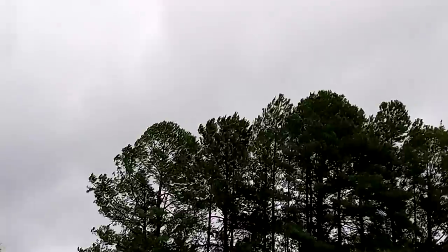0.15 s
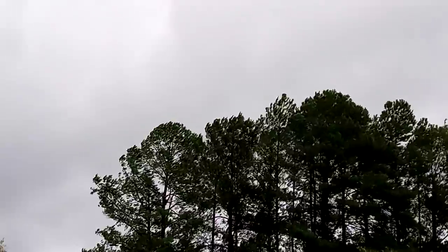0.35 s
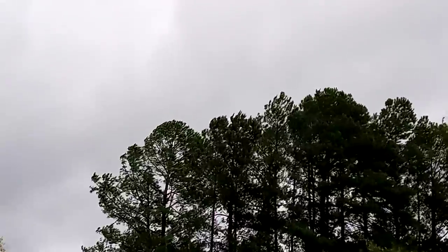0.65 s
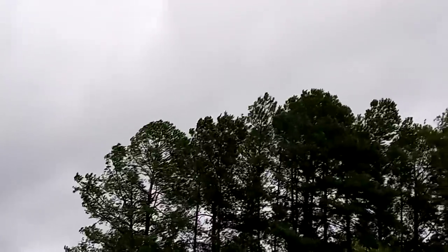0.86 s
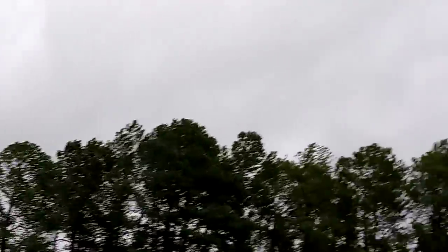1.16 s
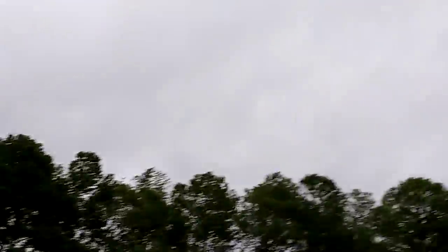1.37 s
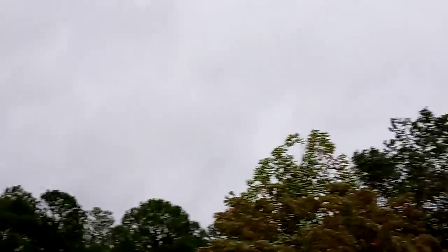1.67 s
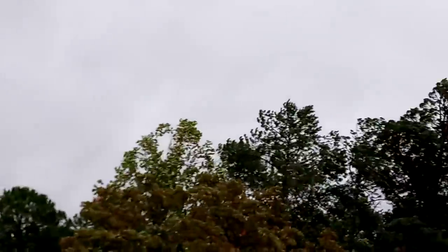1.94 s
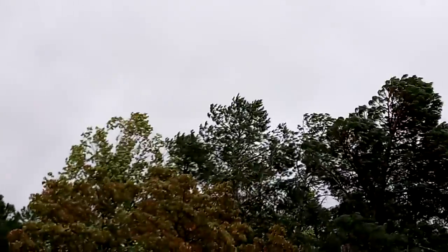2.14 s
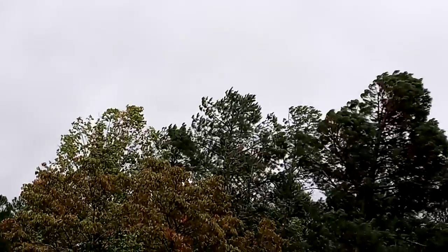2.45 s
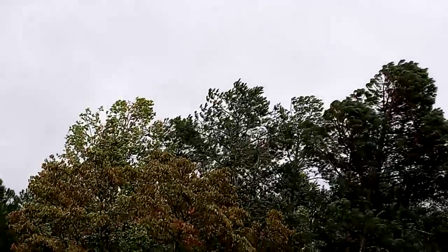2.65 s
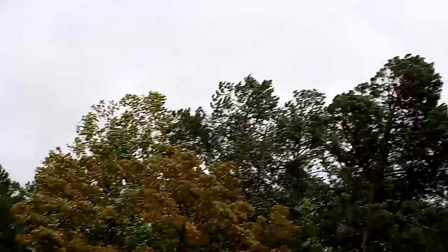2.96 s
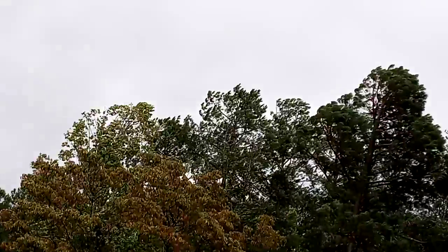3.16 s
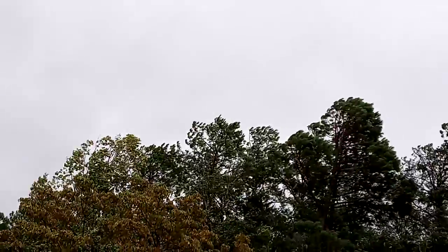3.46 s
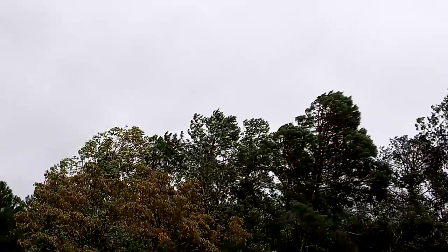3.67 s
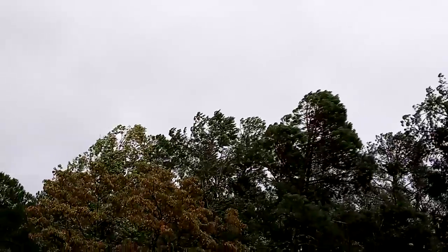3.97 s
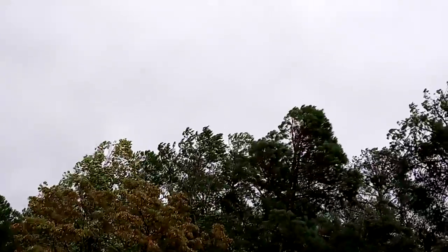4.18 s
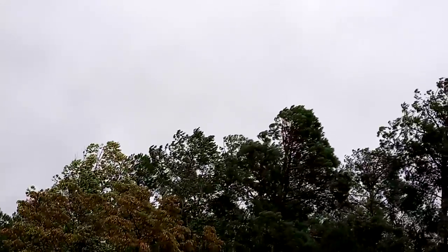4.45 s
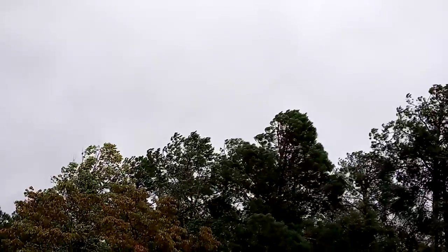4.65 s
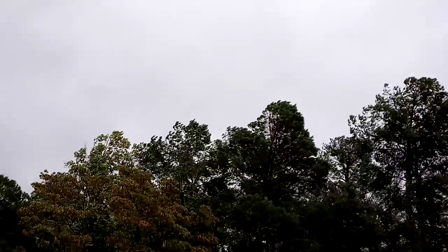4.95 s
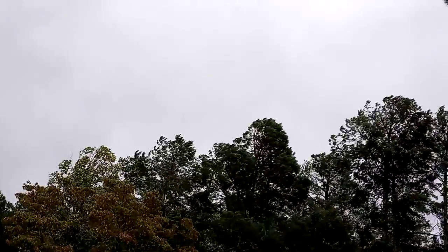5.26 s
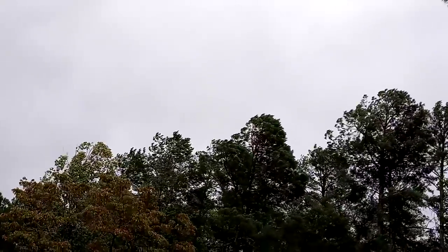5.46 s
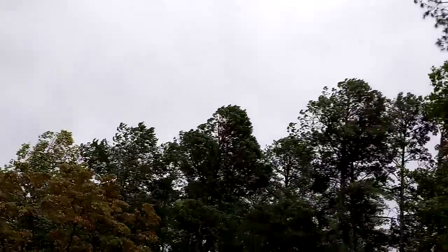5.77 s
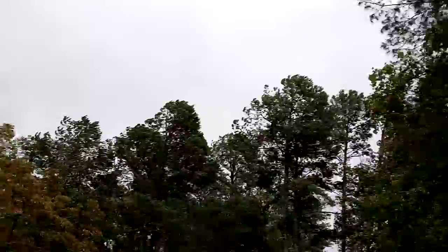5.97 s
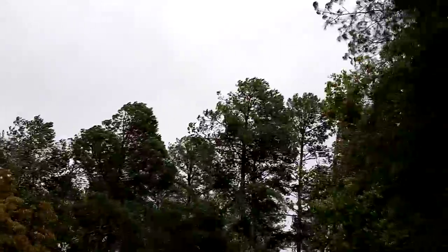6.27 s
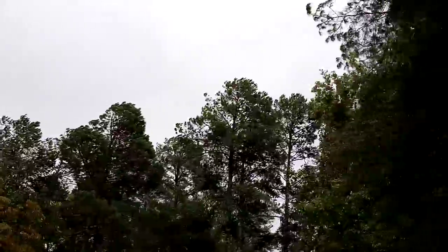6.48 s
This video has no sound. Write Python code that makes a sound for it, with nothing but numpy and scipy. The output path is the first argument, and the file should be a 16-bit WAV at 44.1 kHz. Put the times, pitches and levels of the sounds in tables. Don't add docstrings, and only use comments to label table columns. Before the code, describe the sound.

Broad hissing rush of wind in many treetops, with uneven bassy microphone buffeting, a few tiny ticks, and a close branch rustle at the end.

```python
import sys
import numpy as np
from scipy import signal
from scipy.fft import rfft, irfft, next_fast_len
from scipy.io import wavfile
from scipy.ndimage import uniform_filter1d

SR = 44100
rng = np.random.default_rng(int(sys.argv[2]) if len(sys.argv) > 2 else 0)


def inscribe(sig):
    pcm = np.round(np.clip(np.atleast_2d(sig).T, -1, 1) * 32767)
    wavfile.write(sys.argv[1], SR, pcm.astype(np.int16))


def makeup_ratio(level_db):
    decades = np.asarray(level_db, float) / 20
    return 10 ** decades


N = 291677
T = np.arange(N) / SR
SIZE = next_fast_len(N)
HZ = np.maximum(np.arange(SIZE // 2 + 1) * SR / SIZE, 1)


def curves(table):
    s, *columns = np.transpose(table)
    return [np.interp(T, s, c) for c in columns]


def colour(x, points):
    hz, db = np.transpose(points)
    gain_db = np.interp(np.log(HZ), np.log(hz), db, left=-90, right=-90)
    return rfft(x, SIZE) * makeup_ratio(gain_db)


def band_level(spectrum, lo_hz, hi_hz):
    inside = spectrum[(HZ > lo_hz) & (HZ < hi_hz)]
    return spectrum * SIZE / np.sqrt(2 * np.sum(np.abs(inside) ** 2))


def to_wave(spectrum):
    return irfft(spectrum, SIZE)[:N]


def bands(spectrum, centres_hz):
    for one_hot in np.eye(len(centres_hz)):
        yield to_wave(spectrum * np.interp(np.log(HZ), np.log(centres_hz), one_hot))


def walk(rate_hz):
    k = int(SR / rate_hz)
    held = np.repeat(rng.standard_normal(N // k + 1), k)
    slewed = uniform_filter1d(uniform_filter1d(held, k), k)[:N]
    return slewed / slewed.std()


def eddies(rate_hz, spread_db):
    x = rng.standard_normal(N) * makeup_ratio(spread_db * walk(rate_hz))
    return x / x.std()


def swells(rows, rest_db, rise_s, fall_s):
    power = makeup_ratio(2 * rest_db) + 0 * T
    for start_s, hold_s, level_db in rows:
        rise = np.clip((T - start_s) / rise_s + .5, 0, 1) ** 2
        fall = np.exp(-2 * np.maximum(T - start_s - hold_s, 0) / fall_s)
        power = power + makeup_ratio(2 * level_db) * rise * fall
    return 10 * np.log10(power)


def pulse(pitch_hz, cycles):
    t = np.arange(-1200, 1200) / SR
    bell = np.exp(-.5 * (t * pitch_hz / (0.34 * cycles)) ** 2)
    return bell * np.cos(2 * np.pi * pitch_hz * t + rng.uniform(0, 2 * np.pi))


def add(out, centre_s, x):
    i = int(centre_s * SR) - len(x) // 2 + np.arange(len(x))
    inside = (i >= 0) & (i < N)
    out[i[inside]] += x[inside]


# freq_hz, density_db_per_hz
HISS_COLOUR = [(6000, -22), (8500, -5), (9500, -5), (11000, -8.5), (12500, -12.5), (16000, -10)]


def hiss(level_db=-90):
    noise = colour(rng.standard_normal(N), HISS_COLOUR)
    return makeup_ratio(level_db) * to_wave(band_level(noise, 9500, 15500))


# centre_s, peak_db, pitch_hz
TICKS = [
    (.441, -26, 600),
    (0.494, -25, 596),
    (2.655, -18, 790),
]


def ticks():
    out = np.zeros(N)
    for centre_s, peak_db, pitch_hz in TICKS:
        add(out, centre_s, makeup_ratio(peak_db) * pulse(pitch_hz, 1.0))
    return out


# centre_s, peak_db, pitch_hz
THUMPS = [(.15, -25.5, 151), (0.194, -23, 180), (.359, -22.5, 150), (0.444, -23, 190), (0.494, -21, 180),
          (.553, -18.5, 200), (.584, -18.5, 150), (.649, -24, 160), (0.758, -26, 180), (1.081, -22.5, 180),
          (1.192, -21, 170), (1.247, -17.5, 183), (2.046, -22, 210), (2.11, -19, 200), (2.162, -26, 130),
          (2.456, -27, 160), (2.632, -18, 190), (2.708, -16, 197), (2.77, -17, 200), (2.879, -18.5, 189),
          (2.902, -19, 160), (2.955, -26, 180), (3.03, -18, 190), (3.066, -25, 160), (3.449, -26, 160),
          (4.026, -31, 140), (5.096, -26, 170), (6.421, -23, 160), (6.513, -27.5, 180), (6.575, -23, 181)]


def thumps(body_db=-3.5, front_db=-7):
    out = np.zeros(N)
    for centre_s, peak_db, pitch_hz in THUMPS:
        add(out, centre_s, makeup_ratio(peak_db + body_db) * pulse(pitch_hz, 1.24))
        add(out, centre_s - .002, makeup_ratio(peak_db + front_db) * pulse(2.4 * pitch_hz, 0.95))
    return out


# start_s, hold_s, level_db
SHAKES = [
    (6.43, 0.044, -29),
    (6.545, 0.02, -30),
    (6.58, .02, -26.5),
]
# freq_hz, density_db_per_hz
SHAKE_COLOUR = [(300, -34), (600, -2), (1000, 0), (1700, 3.5), (2600, -4), (3700, -7), (4500, -26),
                (6100, -16), (7200, -34), (8500, -50), (12000, -70)]


def branches(grain_db=2.5):
    level_db = swells(SHAKES, rest_db=-50, rise_s=0.0082, fall_s=.06)
    rustle = band_level(colour(eddies(150, grain_db), SHAKE_COLOUR), 900, 3500)
    onset = np.clip((T - SHAKES[0][0]) / .03, 0, 1)
    return to_wave(rustle) * makeup_ratio(level_db) * onset


# start_s, hold_s, level_db
GUSTS = [(-.03, .07, -41.5), (1.3, 0.17, -46.5), (.12, 0.6, -37), (.83, 0.029, -37), (.95, 0.31, -38),
         (1.76, .04, -40), (1.9, 0.061, -36), (2.06, 0.2, -36.5), (2.34, 0.16, -36), (2.51, 0.18, -39.5),
         (2.68, 0.028, -38.5), (2.75, 0.087, -35.5), (2.86, .18, -33.5), (3.08, 0.14, -37),
         (3.31, 0.044, -37.5), (3.45, 0.15, -40), (3.64, 0.13, -48), (3.86, 0.051, -40), (4.0, 0.032, -42),
         (4.13, 0.22, -42.5), (4.42, .12, -38), (4.64, .05, -38), (5.0, .25, -39), (5.29, .08, -46.5),
         (5.5, 0.039, -40.5), (5.66, 0.062, -48), (5.88, 0.069, -48), (6.05, .1, -51), (6.39, 0.23, -39)]
# freq_hz, density_db_per_hz
RUMBLE_COLOUR = [(12, -45), (20, -24.5), (56, -4.5), (107, 1.5), (255, -6), (386, -14), (428, -13.5),
                 (621, -19.5), (700, -28), (910, -45.5), (1540, -120)]


def buffet(puff_db=0.8, reach_db_per_db=0.35, plume_db=-1.0):
    rumble_db = swells(GUSTS, rest_db=-47.5, rise_s=0.052, fall_s=0.078)
    air = band_level(colour(eddies(40, puff_db), RUMBLE_COLOUR), 50, 160)
    low, high = bands(air, (110, 230))
    high_db = reach_db_per_db * (rumble_db + 34.5) + plume_db
    return makeup_ratio(rumble_db) * (low + high * makeup_ratio(high_db))


# time_s, wind_db, turn (0-1), aim at nearest needles (0-1)
ROAR = [(0.0, -37, 0, 0.34), (0.5, -36, 0, 0), (0.95, -36, 0.04, 0.9), (1.55, -36, 0.33, 0.6),
        (2.65, -34.5, 0.36, 0.93), (3.3, -34.5, 0.69, 0.37), (4.85, -33.5, 0.98, 0), (5.05, -33, 0.85, 0),
        (5.7, -34.5, 0.98, 0), (6.3, -35, 1, 0.27), (6.61, -33.5, 1, 0.6)]
ROAR_HZ = (900, 3000, 5800, 7900)
TURN_DB = (0, 2, 10, -2)
AIM_DB = (-0.5, 4, 0, 7)
# freq_hz, density_db_per_hz
CROWNS_COLOUR = [(120, -16.5), (230, -7.5), (330, -5), (480, -1.5), (900, 1.5), (2600, -2), (3500, -5),
                 (3900, -12), (4550, -22.5), (5900, -17), (6800, -23.5), (7700, -37.5), (8500, -53),
                 (9800, -72)]


def crowns(sway_db=.3, flicker_db=.6, edge_db=3.8):
    wind_db, turn, aim = curves(ROAR)
    shape_db = np.outer(TURN_DB, turn - 1) + np.outer(AIM_DB, aim - .15)
    centres_hz = np.r_[200 * 2 ** np.arange(0, 5.1, 1 / 3), 7400:9300:190]
    places = np.interp(np.log(centres_hz), np.log(ROAR_HZ), np.arange(4))
    noise = band_level(colour(rng.standard_normal(N), CROWNS_COLOUR), 500, 1600)
    out, sway = 0, walk(3.5)
    for place, band in zip(places, bands(noise, centres_hz)):
        k = min(int(place), 2)
        tilt_db = (k + 1 - place) * shape_db[k] + (place - k) * shape_db[k + 1]
        sway = .8 * sway + .6 * walk(4)
        ragged_db = edge_db * walk(26) if place > 2.85 else flicker_db * walk(12)
        out = out + band * makeup_ratio(tilt_db + sway_db * sway + ragged_db)
    return out * makeup_ratio(wind_db)


def scene():
    return (ticks() + thumps() + branches() + buffet() + crowns())[None]


def top_cut(x):
    return signal.sosfilt(signal.butter(12, 15740, fs=SR, output="sos"), x)


def record(dry):
    bass_cut = signal.butter(3, 48, "highpass", fs=SR, output="sos")
    opening = np.clip(T / .004, 0, 1)
    mix = opening * signal.sosfilt(bass_cut, dry) + hiss()
    return top_cut(mix)


dry = scene()
out = record(dry)
inscribe(out)
```